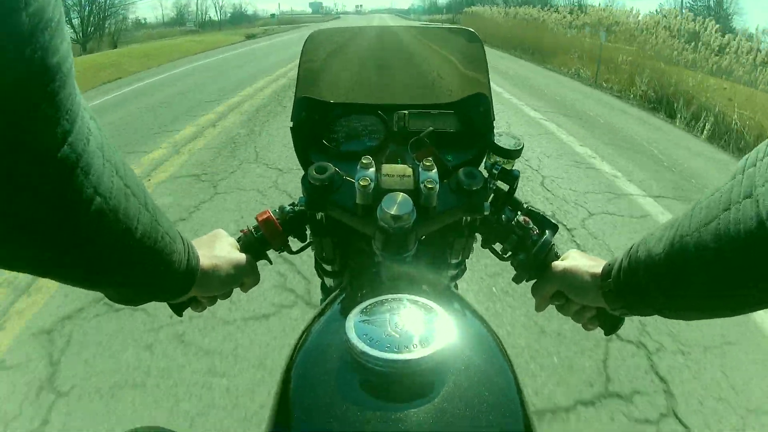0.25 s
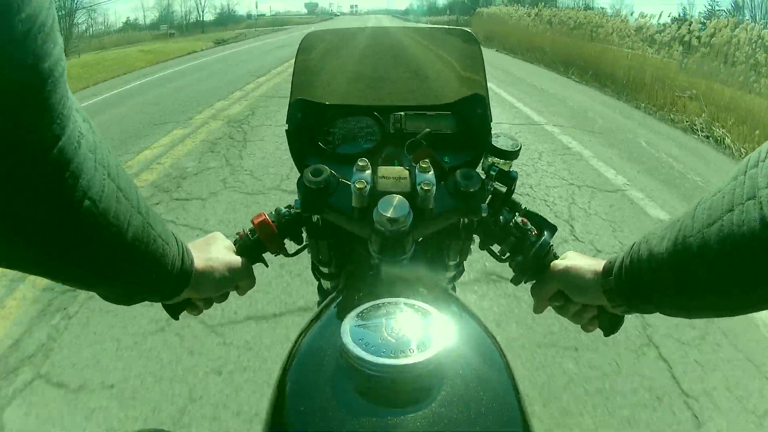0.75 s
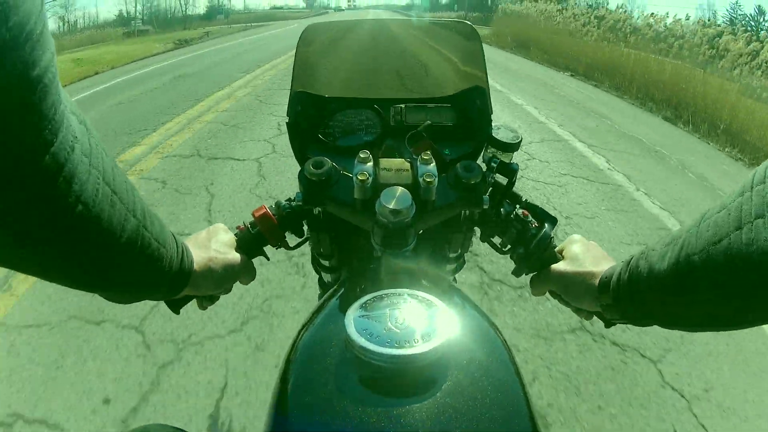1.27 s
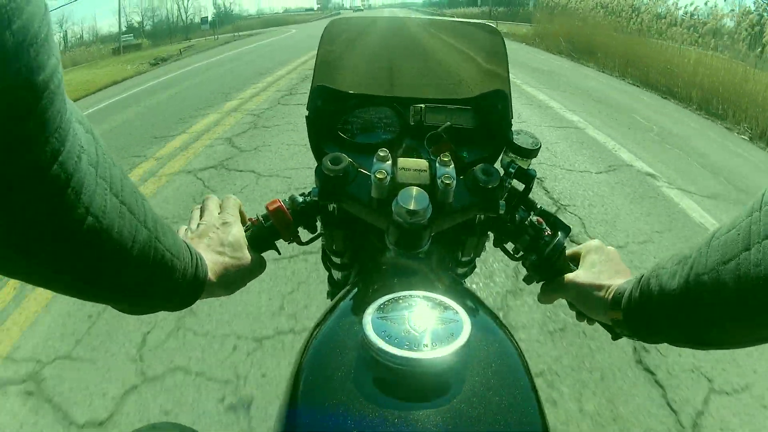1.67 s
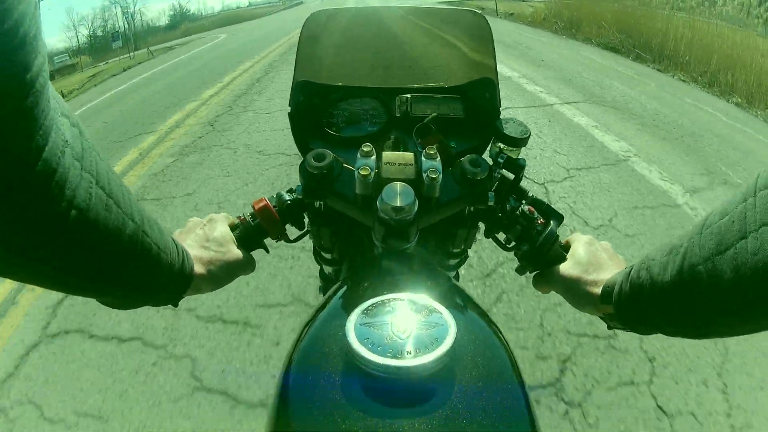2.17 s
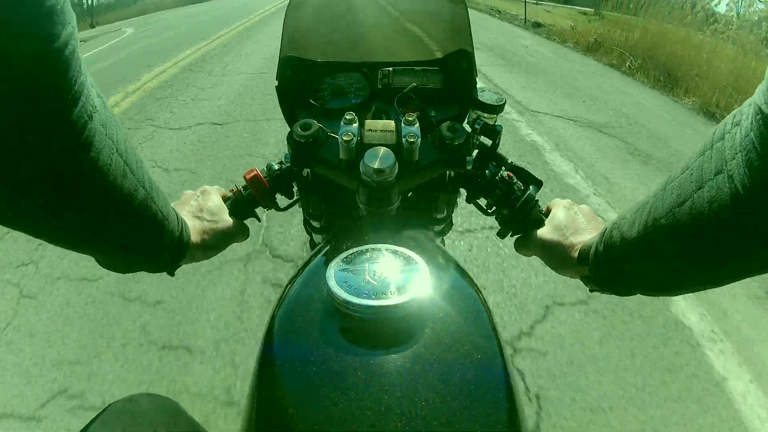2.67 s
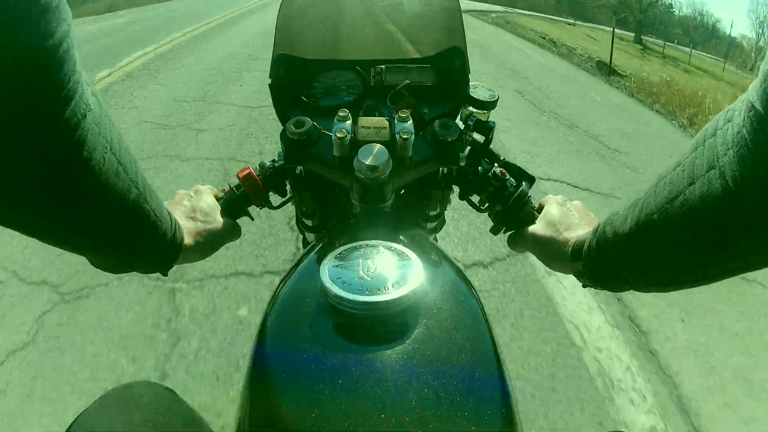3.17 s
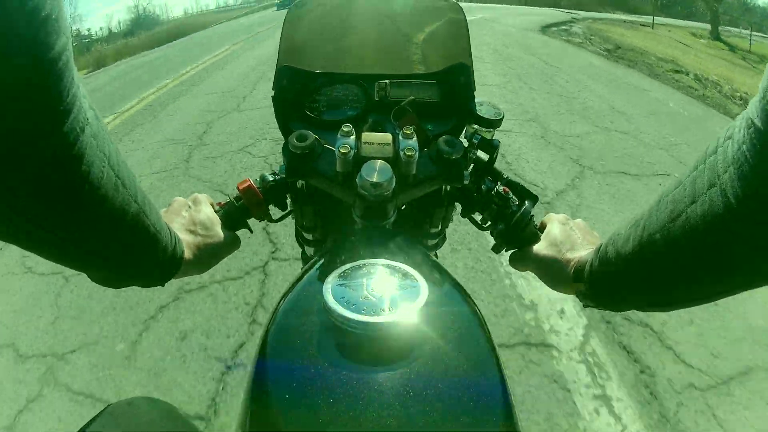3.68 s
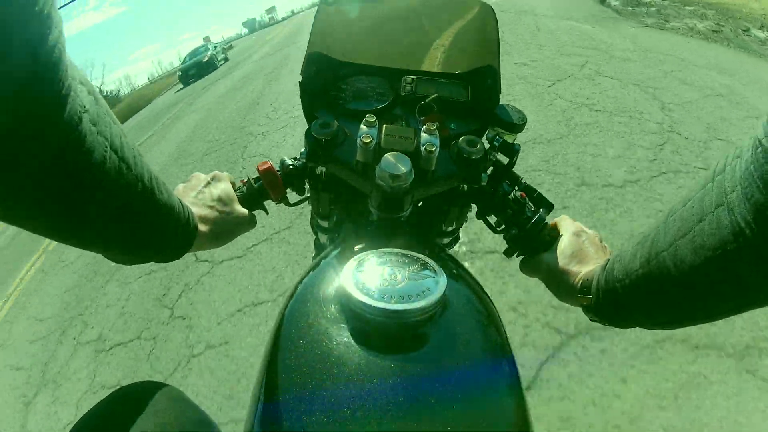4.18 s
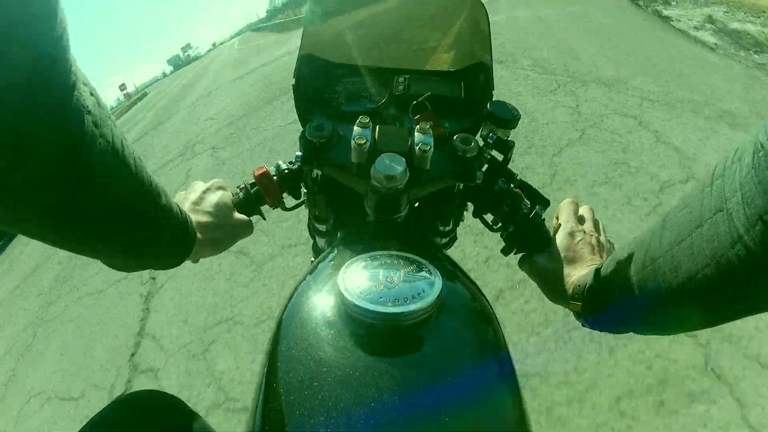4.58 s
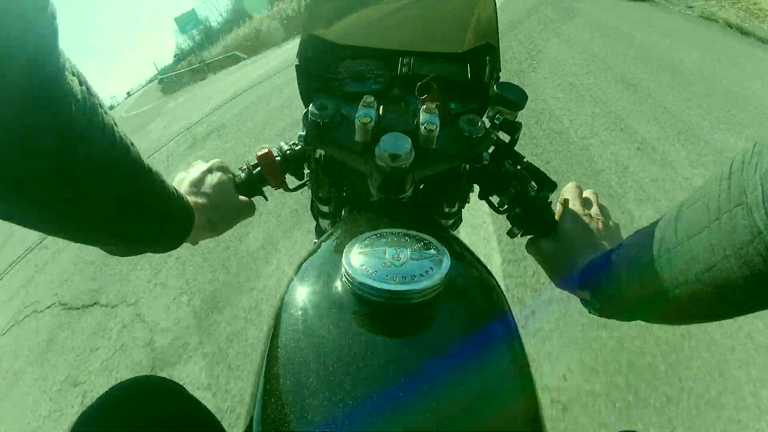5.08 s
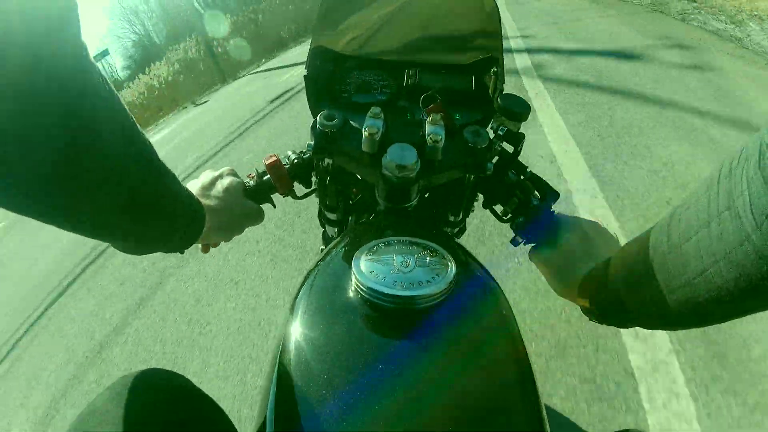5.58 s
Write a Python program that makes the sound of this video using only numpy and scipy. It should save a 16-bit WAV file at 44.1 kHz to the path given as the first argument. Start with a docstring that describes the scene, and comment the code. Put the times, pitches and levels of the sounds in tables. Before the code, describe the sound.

Close chest-mounted stereo microphone in a sealed housing, muffled and hollow: a tuned two-stroke buzzes high and slackens, gives one short throttle blip, then runs off-throttle with mechanical clatter, rumble and scattered pops. After a long coast it sputters in thicker bursts, skips firings, then bites and swells into a raspy snarl with gritty overload crackles. Outdoors on a road, with no noticeable echo.

```python
"""On a moped rider's chest, in a closed housing: a tuned two-stroke engine on the road.
It eases off, blips, coasts with a few stray pops, then stutters, catches and pulls hard until it overloads.
Firing pulses excite resonant pipe and silencer filters; sines add engine harmonics, wind and road add noise.
All sounds shake one housing, whose two microphone ports differ in colour and phase, nearly opposite in the bass."""
import sys
import numpy as np
from scipy import signal
from scipy.fft import rfft, irfft, next_fast_len
from scipy.io import wavfile
from scipy.ndimage import uniform_filter1d, minimum_filter1d

SR = 44100
rng = np.random.default_rng(int(sys.argv[2]) if len(sys.argv) > 2 else 0)


def put_to_file(sound):
    """Save the sound as 16-bit audio at rate SR, in the file named by the first command-line argument."""
    columns = np.atleast_2d(sound).T  # one column per channel
    safe = np.clip(columns, -1, 1)
    whole_steps = np.round(safe * 32767)
    wavfile.write(sys.argv[1], SR, whole_steps.astype(np.int16))


N = 257544
TIME = np.arange(N) / SR
SIZE = next_fast_len(N + SR // 4) // 2 * 2   # room for filter tails
FREQ = np.arange(SIZE // 2 + 1) * SR / SIZE

# All table levels are relative; the sources scale them further.
# Crank speed, one firing a turn: [t/s, f/Hz]
CRANK_SPEED = [(0, 163.8), (.11, 162.3), (.24, 154.6), (.33, 151), (.42, 149.3), (.62, 142), (.78, 137.6),
               (1.02, 134), (1.35, 132.9), (1.49, 138.6), (1.61, 129), (1.9, 119.5), (2.4, 117),
               (2.85, 114), (3.05, 114.8), (3.45, 108.7), (3.75, 108), (4.5, 104.7), (4.85, 114.7),
               (5.4, 129.7), (5.59, 132.8), (5.84, 145.3)]
# Exhaust easing off to a blip: [t/s, bark level/dB, pipe ring level/dB, silencer rasp level/dB]
EASING = [(0, -22.5, -24, -35.5), (.22, -23.5, -25, -39), (.31, -25.5, -27.5, -41),
          (.38, -26.5, -23.5, -43), (.65, -27.5, -21.5, -44.5), (1.1, -27.5, -24, -45),
          (1.34, -26, -24, -44), (1.39, -20, -23, -38), (1.46, -19.5, -19.5, -37.5), (1.49, -25, -21, -42)]
# Exhaust pulling away: [t/s, bark level/dB, pipe ring level/dB, silencer rasp level/dB]
PULLING = [(4.8, -25, -15.5, -44), (4.95, -23.5, -15.5, -42.5), (5.04, -22, -13, -41.5),
           (5.2, -19.5, -15, -39), (5.41, -11.7, -13, -36), (5.6, -15.5, -13, -36),
           (5.72, -20.5, -13.5, -35), (5.84, -19.5, -18, -36)]
# Firings that the rich engine skips while it catches: [t/s]
MISFIRES = [4.804, 4.848, 4.902, 4.947, 4.991, 5.091]
# Short runs of firings on a nearly closed throttle:
# [t/s, level/dB of the first, number of firings, level gained by each next one/dB]
POPS = [(2.2138, -27, 1, 0), (2.2956, -22, 2, -1), (2.352, -23, 1, 0), (2.4563, -23, 1, 0),
        (2.6428, -25, 1, 0), (2.8683, -27, 1, 0), (3.1178, -25, 3, 0), (3.1966, -26, 1, 0),
        (3.2834, -27, 2, 0), (3.59, -28, 2, 0), (3.7942, -28, 1, 0), (3.8834, -25, 1, 0),
        (4.2088, -25.5, 1, 0), (4.3095, -21.5, 2, -6), (4.5136, -25, 1, 0), (4.5520, -14.5, 3, 1.7),
        (4.6168, -10.5, 2, -.3), (4.6715, -9.5, 2, -2.5), (4.7175, -12, 3, 1.2), (4.7708, -11, 3, -3.5)]
# Engine harmonics that stand out in turn while coasting:
# [cycles per crank turn, loudest t/s, width/s, level/dB]
COASTING_HARMONICS = [(15, 1.68, .17, -42), (16, 2.25, .2, -41), (27, 2.35, .2, -47), (29, 2.35, .15, -48),
                      (20, 2.7, .2, -43), (20, 3.22, .28, -41.5), (20, 3.8, .25, -47), (11, 2.1, .6, -39),
                      (10, 3.6, .7, -38.5), (9, 4.25, .25, -41)]
# Bright overload crackles on the hardest firings: [t/s, level/dB]
CRACKLES = [(5.3392, -30), (5.3552, -26), (5.3783, -26), (5.4016, -25), (5.4093, -25), (5.4170, -20),
            (5.4250, -30), (5.4400, -25), (5.4932, -26), (5.5011, -23), (5.5620, -32)]
# Strength of the shaking from road and wind: [t/s, level/dB]
RIDE_SHAKING = [(0, -26), (1, -28.2), (2, -26), (2.5, -23.5), (3.2, -25.6), (3.8, -29.5), (4.4, -34.7),
                (5.25, -30), (5.84, -34)]

# Resonance spectrum of the hot pipe, early in the easing: [f/Hz, level/dB]
HOT_PIPE = [(150, -16), (400, -31), (640, -25), (760, -13), (890, -20), (980, -7), (1070, 1), (1150, -2),
            (1220, -10), (1305, 2), (1410, 0), (1470, -4), (1620, -17), (1800, -22), (1950, -17),
            (2300, -35), (2700, -55), (8000, -100)]
# Resonance spectrum of the cooler pipe, later in the easing: [f/Hz, level/dB]
COOLER_PIPE = [(140, -6), (260, -17), (400, -23), (540, -14), (660, -25), (800, -7), (930, -10), (1070, -2),
               (1220, -6), (1330, -9), (1400, -3), (1480, 2), (1620, -7), (1750, -10), (1900, -27),
               (2300, -34), (2700, -55), (8000, -100)]
# Resonance spectrum of the pipe while the engine catches: [f/Hz, level/dB]
CATCHING_PIPE = [(100, -38), (390, -26), (480, -18), (590, -12), (710, -14), (830, -10), (950, -10),
                 (1060, -9), (1180, -2), (1300, -9), (1420, 1), (1490, 3), (1560, -5), (1660, -9),
                 (1780, -25), (2050, -29), (2700, -55), (8000, -100)]
# Resonance spectrum of the pipe under hard pull: [f/Hz, level/dB]
PULLING_PIPE = [(100, -38), (260, -32), (390, -27), (530, -14), (680, -12), (800, -22), (910, -10),
                (1040, -3), (1170, 1), (1290, -8), (1420, 0), (1560, -5), (1690, -10), (1850, -23),
                (2000, -35), (2230, -32), (2700, -55), (8000, -100)]
# Spectrum of the silencer shell while easing: [f/Hz, level/dB]
EASING_RASP = [(1500, -25), (1980, -12), (2140, 1), (2300, 0), (2450, -9), (2600, -9), (2740, 2), (2950, 0),
               (3100, 0), (3300, -8), (3550, -11), (3770, -3), (4050, -4), (4600, -20), (5200, -27),
               (5900, -15), (6550, -30), (7500, -28), (9000, -46), (16000, -75)]
# Spectrum of the silencer shell while pulling: [f/Hz, level/dB]
PULLING_RASP = [(1500, -25), (2050, -1), (2240, 0), (2450, -4), (2700, -2), (3000, 1), (3420, -11),
                (3740, 0), (4080, 0), (4600, -16), (5200, -25), (5900, -12), (6550, -30), (7500, -30),
                (9000, -50), (16000, -75)]
# Spectrum of the stray pops: [f/Hz, level/dB]
POP_TONE = [(200, -30), (600, -16), (880, -14), (1120, -6), (1270, -11), (1430, 2), (1640, -8), (1950, -29),
            (2500, -34), (3000, -28), (4100, -34), (5200, -56), (6000, -63), (12000, -110)]
# Spectrum of the engine's clatter: [f/Hz, level/dB]
CLATTER_TONE = [(200, -22), (330, -6), (540, -2), (790, -1), (920, -8), (1180, 0), (1290, -3), (1400, -2),
                (1650, -13), (1900, -15), (2080, -22), (2280, -19), (2550, -29), (5000, -60), (9000, -95)]
# Spectrum of the deep buffeting: [f/Hz, level/dB]
BUFFET_TONE = [(8, -12), (20, -1), (35, 0), (80, -2.5), (130, -6), (250, -21), (1000, -70), (5000, -110)]
# Spectrum of the road and wind rumble: [f/Hz, level/dB]
RUMBLE_TONE = [(30, -15), (110, 0), (155, -3), (210, 1), (320, -1), (430, -8), (760, -11), (1000, -22),
               (2000, -42), (8000, -100)]
# Spectrum of the thin rush in the housing: [f/Hz, level/dB]
RUSH_TONE = [(900, -2), (1400, 6), (2050, -4), (2250, -2), (2500, -6), (2780, -7), (2950, 2), (3450, -4),
             (3950, -3), (4600, -15), (5250, -26), (5900, -15), (6550, -32), (6950, -26), (7650, -30),
             (8100, -46), (9500, -46), (14000, -70)]
# Spectrum of the overload's sizzle: [f/Hz, level/dB]
SIZZLE_TONE = [(1500, -25), (2800, 0), (4200, 2), (6700, 1), (8000, -11), (10000, -12), (10800, -28),
               (16000, -50)]
# Spectrum of the overload crackles: [f/Hz, level/dB]
CRACKLE_TONE = [(1500, -25), (3000, 0), (4100, 1), (5000, -7), (6600, -3), (7700, -20), (10000, -21),
                (11000, -34), (16000, -55)]
# Left port against right: [f/Hz, level/dB]
PORT_BALANCE = [(30, -2), (120, 0), (260, 2.5), (500, 0), (900, 1.5), (1200, 0), (1420, -3), (1720, -14),
                (2100, 1), (2600, 3), (3000, -7), (3600, -13), (5200, -7), (6000, -12), (8000, -9),
                (11000, -16)]
# Left port against right: [f/Hz, phase lead/rad]
PORT_PHASE = [(30, 4.0), (150, 3.4), (330, 2.85), (750, 2.7), (1000, 2.35), (1300, 1.75), (1650, 1.65),
              (2050, -.2), (2400, -1.5), (2700, -2.2), (3100, -4.6), (3650, -6), (4250, -6.3), (5400, -8.7)]

# combustion is uneven at part throttle and evens out as the bark grows
ROUGH_AT_PART, PART_THROTTLE_DB, EVENING_PER_DB = .17, -25, .075
HARD_FIRING_S = 5.3995   # one firing of the hard pull; it sets the crank angle
MISFIRE_LOSS, MISFIRE_WIDTH_S = .76, .0062   # share of the blow that a skipped firing lacks
FLUTTER_DB, FLUTTER_HZ = .9, 28   # the exhaust note flutters as the throttle eases
BASS_LAG_S, BASS_BELOW_HZ = .0022, 1420   # the body of each blow arrives after its bright edge
HOWL_HZ, HOWL_DB, HOWL_S, HOWL_WIDTH_S = 1370, -25.5, .07, .2
COAST_FROM_S, COAST_TO_S, COAST_FADE_S = 1.5, 4.65, .15   # the throttle is shut
RATTLE_S, RATTLE_WIDTH_S, RATTLE_DB = 2.37, .13, 5.5   # the clatter swells once while coasting
CATCH_S, CATCH_WIDTH_S, CATCH_DB = 4.68, .17, 7   # and again as the throttle reopens
USUAL_RIDE_DB = -27
BUFFET_SWELL_S, BUFFET_SWELL_WIDTH_S, BUFFET_SWELL_DB = 4.85, .4, 2.5   # deep buffeting swells a little
FIRING_GAP_S = .0092   # between the pops of one run
CUTOFF_HZ = 11400


def from_db(db):
    """Amplitude ratio: twenty decibels make a factor of ten."""
    return 10 ** (np.asarray(db) / 20)


def rms_one(x):
    """Normalization: equal rms means equal mean power."""
    return x / np.sqrt(np.mean(x ** 2) + 1e-20)


def in_time(rows):
    """Linear interpolation: each column of a time curve at every sample."""
    s, *columns = np.transpose(rows)
    return [np.interp(TIME, s, c) for c in columns]


def across_hz(points):
    """Interpolation on a logarithmic frequency axis."""
    hz, value = np.transpose(points)
    return np.interp(np.log(FREQ + 1), np.log(hz), value)


def swell(centre_s, width_s):
    """Gaussian envelope: a smooth rise to 1 and back."""
    return np.exp(-((TIME - centre_s) / width_s) ** 2)


def body(points):
    """Minimum phase: a causal resonant body with this spectrum rings only after a blow."""
    cepstrum = irfft(np.log(from_db(across_hz(points))), SIZE)
    # folding negative times onto positive ones makes the response causal
    cepstrum[1:SIZE // 2] *= 2
    cepstrum[SIZE // 2 + 1:] = 0
    return np.exp(rfft(cepstrum))


def through(x, response):
    """Linear filtering: multiplying spectra convolves sound with an impulse response."""
    return irfft(rfft(x, SIZE) * response, SIZE)[:N]


def drift(corner_hz):
    """Low-passed noise: slow random change with an rms of 1."""
    return rms_one(through(rng.standard_normal(N), 1 / (1 + (FREQ / corner_hz) ** 4)))


def strokes(turns, rough, jitter_s):
    """Periodic excitation: one pulse a crank turn, uneven in strength and timing."""
    at = np.interp(np.arange(np.ceil(turns[-1])), turns, np.arange(N))
    chance = rng.standard_normal((len(at), 2))
    uneven = (rough * np.ones(N))[at.astype(int)]
    at = np.clip(at + chance[:, 0] * uneven * jitter_s * SR, 0, N - 2)
    strength = np.exp(uneven * chance[:, 1] - uneven ** 2)
    # split each pulse between two samples to place it in between
    first, fraction = at.astype(int), at % 1
    early = np.bincount(first, strength * (1 - fraction), N)
    late = np.bincount(first + 1, strength * fraction, N)
    return rms_one(early + late)


def puffs(turns, decay):
    """Modulated turbulence: noise flares as the port opens and decays through the turn."""
    return rms_one(rng.standard_normal(N) * np.exp(-decay * (turns % 1)))


def reflections(share, trip_s):
    """All-pass echoes: waves running along the pipe spread each blow; a share near 1 leaves it intact."""
    share, trip = np.clip(share, 0, .999), np.exp(-2j * np.pi * FREQ * trip_s)
    return (share - trip) / (1 - share * trip)


def bass_lag():
    """Group delay: the path from the pipe delays everything below a crossover."""
    delay_s = BASS_LAG_S / (1 + (FREQ / BASS_BELOW_HZ) ** 30)
    return np.exp(-2j * np.pi * np.cumsum(delay_s) * SR / SIZE)


def shell_modes(ring_s, share):
    """Modal density: direct sound plus a tail of many close modes favours some harmonics."""
    tail = rng.standard_normal(N) * np.exp(-TIME / ring_s)
    return 1 + share * rfft(tail / np.sqrt(np.sum(tail ** 2)), SIZE)


def throttle(rows, fade_s):
    """Source strength: gains of a stretch under power, decaying exponentially outside it."""
    outside = np.maximum(np.maximum(rows[0][0] - TIME, TIME - rows[-1][0]), 0)
    return from_db(in_time(rows)) * np.exp(-outside / fade_s)


def exhaust(turns, rows, tone, rasp_tone, bark_db, ring_db, ring_hz, ring_width_hz,
            direct, trip_s, turbulence, ring_hold):
    """Forced resonance: firings ring the pipe; a wide throttle adds deep bark and rasp around that ring."""
    rough = ROUGH_AT_PART * np.exp(-EVENING_PER_DB * np.maximum(in_time(rows)[0] - PART_THROTTLE_DB, 0))
    bark, ring, rasp = throttle(rows, fade_s=.01)
    firings = strokes(turns, rough, jitter_s=.00009)
    gush = puffs(turns, decay=1.8)
    skipped = sum(np.exp(-((TIME - s) / MISFIRE_WIDTH_S) ** 4) for s in MISFIRES)
    gas = (1 - MISFIRE_LOSS * skipped) * (firings + turbulence * rough * gush)

    pipe = body(tone) * reflections(direct, trip_s) * reflections(share=.35, trip_s=.0009) * bass_lag()
    ring_share = 1 / (1 + ((FREQ - ring_hz) / ring_width_hz) ** 8)
    ring_pipe = pipe * ring_share * reflections(ring_hold, trip_s=.0007)
    barking = from_db(bark_db) * bark * rms_one(through(gas, pipe * (1 - ring_share)))
    ringing = from_db(ring_db) * ring * rms_one(through(gas, ring_pipe))

    # the thin shell of the silencer smears the sharp edge of every firing
    shell = body(rasp_tone) * reflections(share=.6, trip_s=.0013) * shell_modes(ring_s=.012, share=.8)
    rasping = rasp * rms_one(through(firings + .3 * gush, shell))
    return barking + ringing + rasping


def blend(first, second, from_s, to_s):
    """Linear crossfade: the pipe passes from one voice to the next as the load changes."""
    share = np.interp(TIME, [from_s, to_s], [0, 1])
    return (1 - share) * first + share * second


def howl(waver_db, wobble_rad):
    """Beating: at high revs the pipe's own pitch sounds against the nearest engine harmonic."""
    level = from_db(HOWL_DB + waver_db * drift(15)) * swell(HOWL_S, HOWL_WIDTH_S)
    return level * np.sin(2 * np.pi * HOWL_HZ * TIME + wobble_rad * drift(12))


def coasting():
    """Load envelope: 1 while the throttle is shut, 0 under power."""
    inside_s = np.minimum(TIME - COAST_FROM_S, COAST_TO_S - TIME)
    return np.clip(.5 + inside_s / COAST_FADE_S, 0, 1)


def shaking_db():
    """Relative level: how much harder than usual road and wind shake the moped."""
    return in_time(RIDE_SHAKING)[0] - USUAL_RIDE_DB


def overrun(turns, level_db, coasting_db, follows_ride, pumping, burble_db):
    """Cyclic impacts: fired or not, the engine pumps and clatters, more so when unloaded and shaken."""
    knocks = pumping * strokes(turns, rough=.2, jitter_s=.0001) + puffs(turns, decay=.7)
    db = level_db + coasting_db * coasting() + follows_ride * shaking_db()
    db = db + RATTLE_DB * swell(RATTLE_S, RATTLE_WIDTH_S) + CATCH_DB * swell(CATCH_S, CATCH_WIDTH_S)
    clatter = rms_one(through(knocks, body(CLATTER_TONE) * bass_lag()))
    return from_db(db + burble_db * drift(20)) * clatter


def ride(turns, buffet_db, buffet_follows, waver_db, rumble_db, rush_db, rush_follows):
    """Coherence: both ports share buffeting and rumble, while each has its own thin rush."""
    shake_db = shaking_db()
    buffet_level = buffet_db + buffet_follows * shake_db
    buffet_level = buffet_level + BUFFET_SWELL_DB * swell(BUFFET_SWELL_S, BUFFET_SWELL_WIDTH_S)
    buffet = rms_one(through(rng.standard_normal(N), body(BUFFET_TONE)))
    buffet = from_db(buffet_level + waver_db * drift(10)) * buffet

    pulling = np.interp(TIME, [4.4, 5.4], [0, 1])   # as the engine takes over, rumble recedes and rush grows
    rumble = rms_one(through(rng.standard_normal(N), body(RUMBLE_TONE)))
    rumble = from_db(rumble_db + shake_db + waver_db * drift(7) - 3.5 * pulling) * rumble

    housing = body(RUSH_TONE)
    rush_level = from_db(rush_db + rush_follows * shake_db + 4.5 * pulling)
    port_noises = [rms_one(through(puffs(turns, decay=.6), housing)) for port in range(2)]
    return buffet + rumble + rush_level * np.array(port_noises)


def coasting_harmonics(turns, waver_db, wobble_depth):
    """Harmonic series: whole multiples of crank speed stand out in turn; phase wobble roughens them."""
    waver, wobble = waver_db * drift(14), wobble_depth * drift(45)
    harmonics = np.zeros(N)
    for per_turn, s, width_s, db in COASTING_HARMONICS:
        phase = 2 * np.pi * per_turn * turns + wobble * per_turn
        harmonics += from_db(db + waver) * swell(s, width_s) * np.sin(phase)
    return harmonics


def pops(level_db, gas_share, gas_s, direct, ring_hz, ring_width_hz):
    """Impulse response: a pressure step and a short gush of gas ring the pipe for a few milliseconds."""
    blows = np.zeros(N)
    age = np.arange(SR // 25) / SR
    for s, db, count, growth_db in POPS:
        for k in range(round(count)):
            blow = gas_share * rng.standard_normal(len(age)) * np.exp(-age / gas_s)
            blow[0] += 1
            start = int((s + k * FIRING_GAP_S) * SR)
            blows[start:start + len(age)] += from_db(db + k * growth_db) * blow
    resonance = 1 / (1 + 2j * (FREQ - ring_hz) / ring_width_hz)
    pipe = body(POP_TONE) * reflections(share=.45, trip_s=.0007) * (direct + resonance)
    return from_db(level_db) * through(blows, pipe / np.abs(irfft(pipe)).max())


def overload_crackle(sound, threshold_db, level_db, sizzle, uneven_db):
    """Overload: at full bark the microphone overloads and sizzles, most on pulse peaks."""
    excess = np.maximum(from_db(in_time(PULLING)[0] - threshold_db) - 1, 0)
    peaks = sound ** 2 * from_db(uneven_db * np.minimum(drift(70), 1.5))
    noise = rng.standard_normal(N) * (sizzle + peaks)
    return from_db(level_db) * excess * through(noise, body(SIZZLE_TONE))


def single_crackles(level_db, decay_s):
    """Transient noise: each overload crackle is a bright burst about a millisecond long."""
    envelope = np.zeros(N)
    for s, db in CRACKLES:
        envelope += from_db(db) * (TIME >= s) * np.exp(-np.abs(TIME - s) / decay_s)
    return from_db(level_db) * through(rng.standard_normal(N) * envelope, body(CRACKLE_TONE))


def scene():
    """Superposition: all sounds are summed, and the two ports differ in phase and colour."""
    speed_hz, = in_time(CRANK_SPEED)
    turns = np.cumsum(speed_hz) / SR
    turns = turns - np.interp(HARD_FIRING_S, TIME, turns) % 1

    hot = exhaust(turns, EASING, HOT_PIPE, EASING_RASP, bark_db=-1.8, ring_db=0, ring_hz=1550,
                  ring_width_hz=290, direct=.85, trip_s=.0021, turbulence=.4, ring_hold=.55)
    cooler = exhaust(turns, EASING, COOLER_PIPE, EASING_RASP, bark_db=-.1, ring_db=-.2, ring_hz=1600,
                     ring_width_hz=330, direct=.85, trip_s=.0021, turbulence=.9, ring_hold=.55)
    catching = exhaust(turns, PULLING, CATCHING_PIPE, PULLING_RASP, bark_db=-.2, ring_db=.3, ring_hz=1600,
                       ring_width_hz=330, direct=.9, trip_s=.0008, turbulence=1.9, ring_hold=.55)
    pulling = exhaust(turns, PULLING, PULLING_PIPE, PULLING_RASP, bark_db=-.2, ring_db=.3, ring_hz=1600,
                      ring_width_hz=330, direct=1, trip_s=.0008, turbulence=1.3, ring_hold=1)
    easing = blend(hot, cooler, from_s=.75, to_s=1.0) * from_db(FLUTTER_DB * drift(FLUTTER_HZ))
    sound = easing + howl(waver_db=1.5, wobble_rad=.4)
    sound = sound + blend(catching, pulling, from_s=5.1, to_s=5.2)

    # the overload follows the peaks of the exhaust and howl, so it comes before the other sources
    sound = sound + overload_crackle(sound, threshold_db=-16.5, level_db=-28, sizzle=.25, uneven_db=3)
    sound = sound + single_crackles(level_db=6.5, decay_s=.0007)
    sound = sound + pops(level_db=4.2, gas_share=.045, gas_s=.0033, direct=.85,
                         ring_hz=1430, ring_width_hz=170)
    sound = sound + overrun(turns, level_db=-30, coasting_db=2.0, follows_ride=.6,
                            pumping=.55, burble_db=.8)
    sound = sound + coasting_harmonics(turns, waver_db=2.0, wobble_depth=.04)
    left, right = sound + ride(turns, buffet_db=-23, buffet_follows=.7, waver_db=1.6,
                               rumble_db=-24.4, rush_db=-40.5, rush_follows=.7)
    left_port = from_db(across_hz(PORT_BALANCE)) * np.exp(1j * across_hz(PORT_PHASE))
    return np.array([through(left, left_port), right])


def record(dry):
    """Dynamic range and bandwidth: a limiter holds down the tallest pulses and a low-pass cuts the top."""
    top = .95
    room = top / np.maximum(np.abs(dry).max(axis=0), top)
    gain = uniform_filter1d(minimum_filter1d(room, size=400), size=400)
    low_pass = signal.cheby1(10, .2, CUTOFF_HZ, fs=SR, output="sos")
    return signal.sosfilt(low_pass, dry * gain)


dry = scene()
out = record(dry)
put_to_file(out)
```